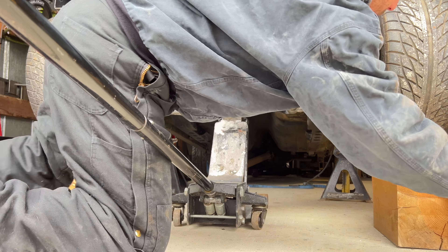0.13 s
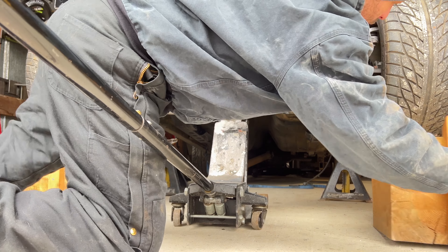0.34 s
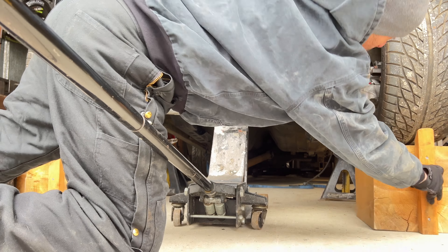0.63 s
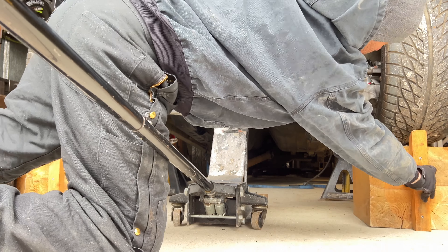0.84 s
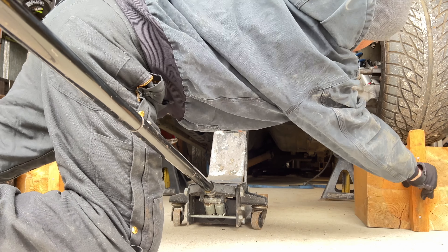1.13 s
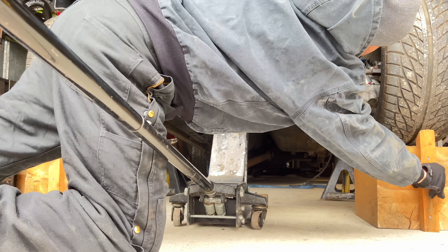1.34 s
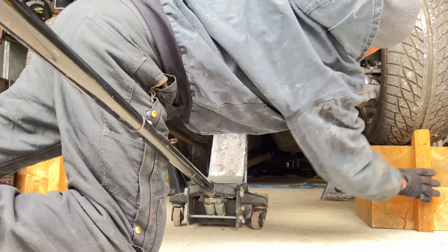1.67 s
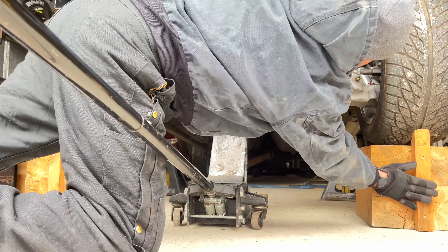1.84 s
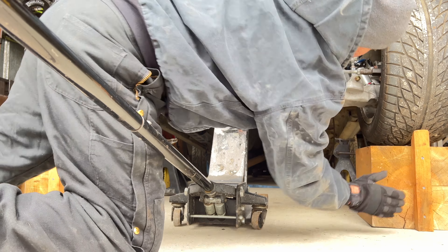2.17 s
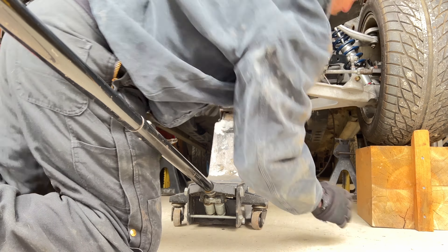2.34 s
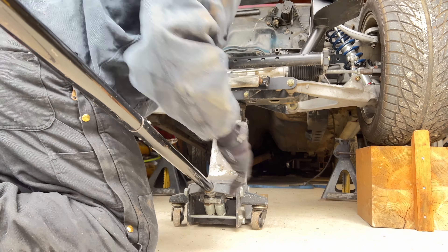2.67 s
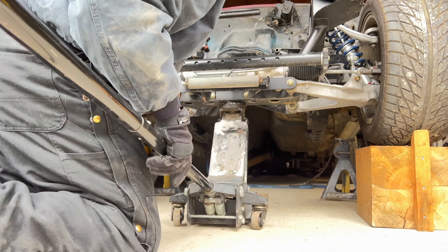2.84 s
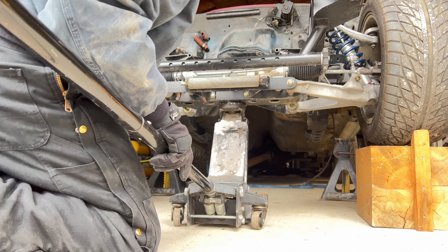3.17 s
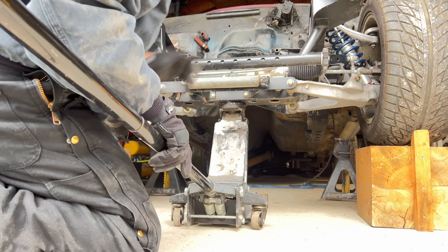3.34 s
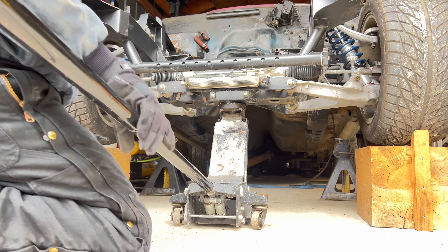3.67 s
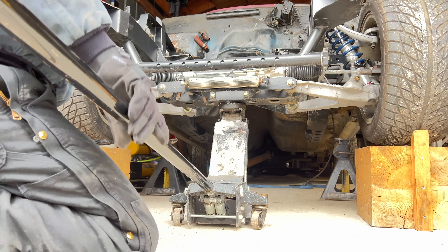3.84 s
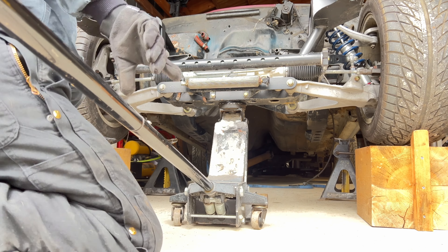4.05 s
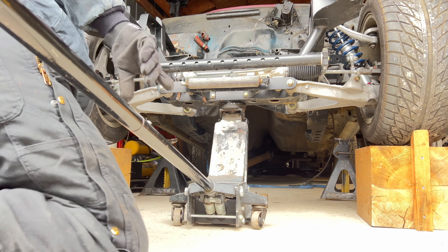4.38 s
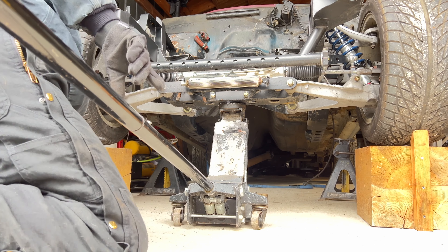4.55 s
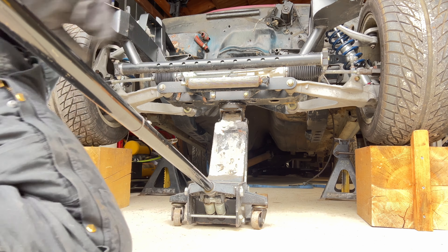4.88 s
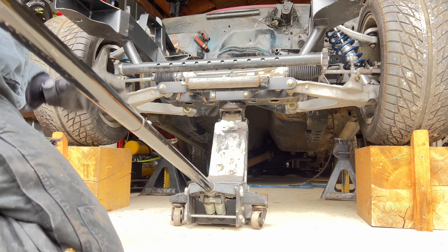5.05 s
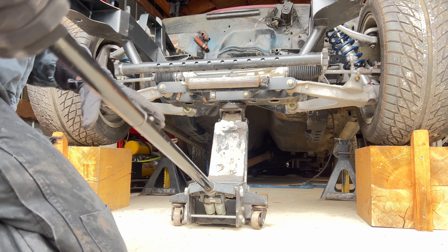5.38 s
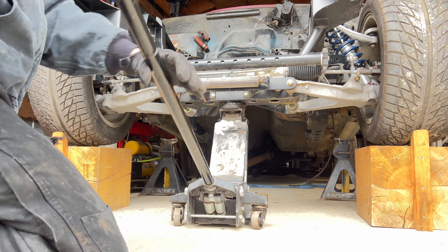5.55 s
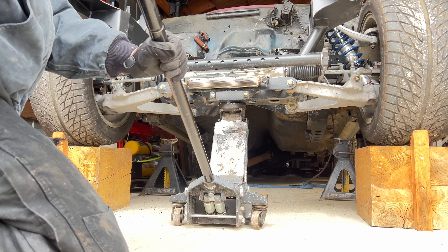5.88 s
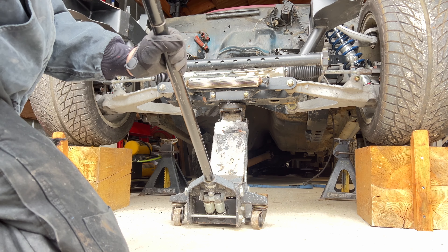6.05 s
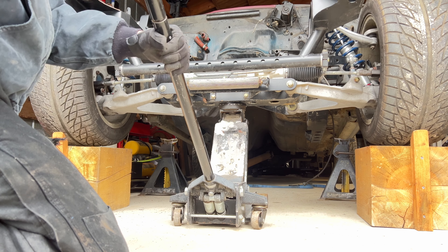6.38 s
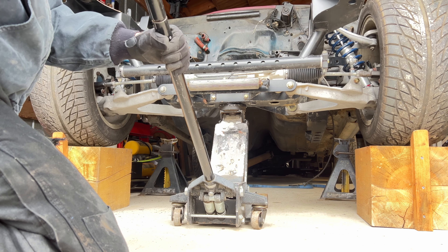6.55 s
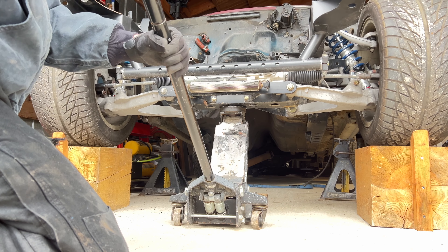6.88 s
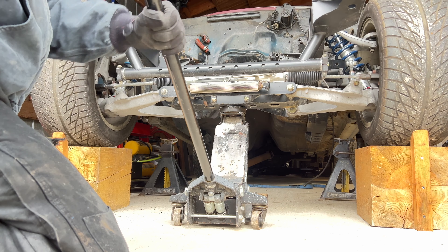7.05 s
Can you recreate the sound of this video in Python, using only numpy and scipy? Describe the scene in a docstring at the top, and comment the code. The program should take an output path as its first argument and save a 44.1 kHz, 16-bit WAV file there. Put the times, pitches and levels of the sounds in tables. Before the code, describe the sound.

Wood scrapes and crunches on a garage floor, then heavy clothes rustle among soft thuds and a metal jack handle clinks.

```python
"""In a garage, a mechanic kneels by a floor jack and shoves a wooden wheel block to the right.
The wood sticks and slips on the concrete, so it scrapes, shudders and crunches the grit under it.
He shifts his weight with a thud, his work clothes rub and rustle on the left, a zipper pull tinkles,
and the steel jack handle clinks in its socket as he takes hold of it."""
import sys
import numpy as np
from scipy import signal
from scipy.fft import rfft, irfft, next_fast_len
from scipy.io import wavfile
from scipy.ndimage import map_coordinates

SR = 44100
rng = np.random.default_rng(int(sys.argv[2]) if len(sys.argv) > 2 else 0)


def output_pcm(signal):
    """Save a mono or channel-first signal as 16-bit PCM at the path in sys.argv[1].

    Samples are clipped to [-1, 1] before scaling.
    """
    pcm = np.clip(np.atleast_2d(signal).T, -1, 1) * 32767
    wavfile.write(sys.argv[1], SR, np.round(pcm).astype(np.int16))


N = 318402

# The tone of each noise. Each row: frequency in Hz, relative level in dB.
AIR_TONE = [(20, -12), (80, 6.5), (180, -4.5), (500, -15), (1100, -11), (1500, -13), (1800, -5.5),
            (2200, -10), (2900, -30), (7500, -24), (11000, -42.5), (16000, -38)]  # the quiet room
FLAP_TONE = [(15, -24.5), (35, -4), (80, 0), (170, -2.5), (300, -5), (450, -12.5), (800, -21),
             (1500, -43.5)]  # cloth flapping
RUB_TONE = [(200, -11), (450, -0.5), (650, 0.5), (1100, -2.5), (1500, -4), (2100, -2), (3000, -9.5),
            (5000, -28)]  # cloth rubbing
SWISH_TONE = [(1500, 2.5), (3000, 2), (4500, 2.5), (7000, 0), (9000, -3.5), (11000, -6), (13500, -16),
              (16000, -16.5)]  # cloth swishing
SCRAPE_TONE = [(130, -37), (220, -4.5), (376, 2), (451, 5.5), (586, -6), (686, -3), (845, -5.5),
               (1080, -0.5), (1410, 1.5), (5000, -26.5), (6500, -55), (11000, -120)]  # wood on concrete
SHUDDER_TONE = [(15, -11), (35, -18), (55, -2.5), (73, 2.5), (110, -2.5), (160, -4.5), (250, -14.5),
                (500, -46)]  # the block shaking
GRIT_TONE = [(1500, -29.5), (2700, 3.5), (4500, 1.5), (7000, -2.5), (10000, -3), (12000, -5.5),
             (13500, -20), (16000, -7)]  # coarse grit
SAND_TONE = [(1500, -18), (2700, -13), (4800, -13), (6100, 4.5), (6600, 17), (7100, -19), (9000, 10.5),
             (10800, 11), (12500, -11), (16000, -14)]  # fine sand
# How alike a noise is in both ears. Each row: frequency in Hz, likeness from 0 to 1.
EAR_LIKENESS = [(60, 1), (130, 0.95), (280, 0.92), (600, .72), (1200, 0.2), (3000, 0.13), (7000, 0.44)]
# The garage's echo. Each row: frequency in Hz, fade time in seconds (the time to fall by 60 dB).
ECHO_FADES = [(70, 0.4), (170, 0.16), (500, 0.13), (2000, 0.2), (10000, .15)]
# The faint rustle of the kneeling man. Each row: time in seconds, level in dB.
STIRRING = [(0.0, -67), (0.36, -68.5), (1.8, -71.5), (2.01, -83.5), (2.28, -66), (2.97, -65.5), (3.03, -80),
            (3.3, -64.5), (4.44, -68.5), (4.52, -80), (4.8, -74.5), (4.95, -62.5), (5.3, -67),
            (5.45, -64.5), (6.08, -79.5), (6.17, -80), (6.4, -67.5), (6.5, -100), (6.68, -71.5),
            (6.87, -89.5), (6.96, -59.5), (7.22, -68.5)]
# Sweeps of a sleeve or trouser leg. Each row: start, length and rise time in seconds,
# then the levels of rub, flap and swish in dB.
CLOTH_SWEEPS = [ (0.143, 0.078, 0.016, -50.5, -47, -53.5), (2.275, 0.027, .01, -58.5, -68, -72.5),
                (2.528, 0.11, .02, -80, -58.5, -72.5), (2.742, 0.11, 0.024, -53, -51.5, -51.5),
                (2.904, 0.068, 0.02, -60.5, -54.5, -60), (3.057, 0.085, 0.011, -70, -69, -63.5),
                (3.446, 0.055, 0.018, -59.5, -63, -58), (3.63, 0.043, 0.031, -53.5, -58, -56),
                (3.776, 0.028, 0.0032, -57, -53.5, -58), (3.975, 0.053, 0.011, -49.5, -50, -49.5),
                (4.094, 0.038, 0.0042, -56.5, -58, -61), (4.194, 0.066, 0.007, -49.5, -46.5, -56),
                (4.313, 0.12, 0.0061, -51, -56.5, -48.5), (4.379, 0.063, 0.022, -49, -48, -53.5),
                (4.609, 0.024, .01, -71, -61, -78), (4.862, 0.07, 0.012, -69, -61, -66),
                (5.051, 0.056, 0.024, -50.5, -52, -50.5), (5.099, 0.089, .02, -52.5, -54.5, -54.5),
                (5.353, 0.075, 0.016, -57.5, -56, -63), (5.568, 0.077, 0.018, -54, -50, -54.5),
                (5.666, 0.051, .01, -67, -58, -75), (5.845, 0.045, .008, -66, -54, -89),
                (5.924, 0.143, 0.011, -60, -57.5, -66), (6.043, 0.037, .012, -59.5, -54.5, -77),
                (6.102, 0.025, .01, -74, -61.5, -87), (6.348, 0.024, 0.01, -61.5, -59, -69),
                (6.703, 0.049, 0.026, -62, -57.5, -63), (6.930, 0.045, 0.0098, -60.5, -59, -57),
                (6.989, 0.033, 0.0072, -47.5, -43.5, -51.5), (7.042, 0.071, 0.011, -53, -52.5, -53),
                (7.198, 0.044, 0.018, -54, -59, -77.5), ]
# Snaps of grit, wood, cloth and fasteners. Each row: start in seconds, level in dB, pitch in Hz,
# fade time in seconds, side (below 0 is left, above 0 is right).
SMALL_SNAPS = [(0.113, -47.5, 11900, .03, -.16), (0.380, -42, 4900, .015, .83),
               (0.958, -31.5, 1750, 0.048, .64), (0.967, -27, 10100, 0.026, -.18),
               (0.992, -32, 9000, .047, .3), (1.112, -38, 5930, .046, -0.16), (1.136, -36, 8000, .048, .3),
               (1.305, -30.5, 9660, .067, .3), (1.337, -28.5, 9850, 0.11, .55),
               (1.402, -29, 7150, .033, .3), (1.839, -29.5, 950, 0.026, .86), (2.475, -37, 9700, .023, .07),
               (3.075, -45.5, 4850, 0.025, -1.5), (3.783, -45, 5000, 0.02, -.55),
               (3.883, -48, 7000, 0.015, -1.1), (3.982, -39.5, 3970, 0.04, -1),
               (4.110, -39.5, 4200, .03, -1), (4.203, -31.5, 1050, 0.028, -.58),
               (4.314, -28, 3300, 0.012, -1), (4.403, -28, 7470, .017, -1.1),
               (4.414, -35.5, 950, .05, -1.2), (4.903, -48.5, 10000, 0.019, -.8),
               (5.569, -38.5, 845, 0.045, -.5), (5.599, -38.5, 9200, .02, -.68),
               (5.600, -37.5, 1600, 0.032, -.58), (5.640, -30, 13970, .018, -.85),
               (5.669, -38.5, 9670, 0.043, -.65), (5.996, -41, 5900, 0.015, -1),
               (6.061, -43.5, 5000, 0.021, -1), (6.321, -46.5, 6020, 0.052, -1.2),
               (6.392, -47.5, 7100, 0.013, -1.1), (6.643, -55.5, 5800, .039, -1)]
# The zipper pull's tinkles. Each row: start in seconds, level in dB.
ZIPPER_TINKLES = [(4.404, -44.5), (4.427, -40.5), (4.433, -35.5)]
# The notes that metal rings with. Each row: pitch in Hz, relative level in dB, fade time in seconds.
ZIPPER_NOTES = [(9700, 3.5, 0.025), (12500, -5.5, 0.041), (15180, -9.5, 0.045)]
HANDLE_NOTES = [(1135, 2.5, 0.041), (1800, -3, 0.046), (2083, 5, 0.013), (2410, 1.5, 0.051),
                (2970, -9, 0.054), (3270, -9.5, 0.083), (4080, -15, .05), (5530, -4.5, 0.081),
                (6900, -19, 0.064), (8900, -22, 0.051)]
# The handle hits its socket. Each row: start in seconds, ring and rattle levels in dB,
# the rattle's fade time in seconds, treble lift in dB per octave.
HANDLE_CLINKS = [(5.395, -45.5, -37, 0.029, 2), (6.987, -59, -45.5, 0.17, 2.5),
                 (6.994, -50, -29.5, 0.042, 0.5)]
# Dull blows of block, knees, hands and jack. Each row: start in seconds, level in dB,
# pitch in Hz at the loudest moment, head start of the right ear in milliseconds.
DULL_BLOWS = [(0.029, -55.5, 258, 0), (0.268, -48.5, 500, 0), (0.434, -24, 204, .22),
              (0.444, -30.5, 87.5, .22), (0.874, -47, 395, .15), (0.985, -37, 79, .13),
              (1.169, -50.5, 120, .15), (1.412, -43, 94, .15), (1.561, -42, 101, .15),
              (1.719, -40.5, 124, .22), (1.832, -35.5, 140, .15), (1.864, -33, 220, .15),
              (2.165, -47.5, 190, -.07), (2.434, -43, 368, -.18), (2.475, -16.5, 323, -.24),
              (2.479, -41, 47.5, -.1), (2.659, -48, 330, -.2), (2.696, -46.5, 323, -.21),
              (3.129, -48, 246, -.2), (4.202, -33.5, 524, -.1), (4.203, -42, 90, -.07),
              (4.261, -43.5, 143, -.12), (4.392, -41.5, 109, -.12), (4.876, -47.5, 316, -.15),
              (5.399, -40, 320, -.17), (5.579, -37, 201, -.05), (5.798, -44.5, 1040, -.23),
              (5.852, -57, 387, -.2), (6.055, -42, 245, -.2), (6.396, -49.5, 950, 0),
              (6.993, -40.5, 290, -.2)]
# Pitches that a space or object boosts. Each row: pitch in Hz, width in Hz, relative level in dB.
FLOOR_SLAB = [(40, 9.2, -15), (156.4, 11, -8.5), (286, 40, -18), (390, 53, -9)]  # the concrete floor slab
BLOCK_BODY = [(482.5, 23, 1.5), (704, 44, 3), (878, 75, 6), (1240, 54, -2), (1870, 240, -2),
              (2223, 170, -5.5), (2510, 39, -3.5)]  # the wooden block
# Shoves of the block. Each row: start, length and rise time in seconds, scrape, shudder and grit levels
# in dB, share of sand in the grit from 0 to 1, chatter pitch in Hz, chatter in dB above the scrape.
BLOCK_SHOVES = [ (0.372, 0.07, 0.036, -48, -45.5, -55, 0.2, 474.5, 1),
                (0.428, 0.34, 0.0046, -42, -39.5, -45.5, 0.06, 799, -1.5),
                (0.51, 0.12, 0.034, -44.5, -74, -59.5, 0, 1394, 2.5),
                (0.861, 0.16, 0.008, -63, -66, -69.5, 0, 800, -24),
                (0.953, 0.028, 0.0048, -45, -47.5, -44.5, 0.8, 1560, 4.5),
                (0.99, 0.019, .002, -41, -42, -48, .35, 1350, 7.5),
                (1.108, 0.039, .004, -51.5, -62, -48.5, .05, 439, -1.5),
                (1.192, 0.083, .03, -42.5, -46.5, -49, 0.27, 849, 1),
                (1.294, 0.097, .012, -44, -44, -47, 1, 1508, 1.5),
                (1.395, 0.015, 0.0045, -45, -48.5, -51, 0, 1250, 1.5),
                (1.498, 0.052, 0.031, -46, -48.5, -56, 0.6, 1184, -13),
                (1.629, 0.04, 0.019, -63.5, -73, -58.5, 0.12, 1000, -12),
                (1.824, 0.072, 0.017, -43.5, -38, -50, .2, 910, -20), ]


def amp(db):
    """Turn decibels into a volume factor."""
    return 10 ** (np.asarray(db) / 20)


def unit(x):
    """Scale a sound to an average strength (rms) of 1."""
    return x / np.sqrt(np.mean(x ** 2) + 1e-20)


def along(points, hz):
    """Read between a table's rows on a log frequency scale."""
    freqs, values = np.transpose(points)
    return np.interp(np.log(hz + 1), np.log(freqs + 1), values)


def wobble(per_s):
    """A smooth curve through per_s random values a second."""
    values = rng.standard_normal(int(N * per_s / SR) + 4)
    return map_coordinates(values, [np.arange(N) * per_s / SR])


def filtered(x, response):
    """Scale and delay each frequency as the response says."""
    n = x.shape[-1]
    size = next_fast_len(n + SR // 8)
    return irfft(rfft(x, size) * response(np.fft.rfftfreq(size, 1 / SR)), size)[..., :n]


def colour(x, tone):
    """Give a noise the tone in a table, at strength 1."""
    return unit(filtered(x, lambda hz: amp(along(tone, hz))))


def resonance(hz, centre, width):
    """A response that favours one pitch."""
    return 1j * hz * width / (centre ** 2 - hz ** 2 + 1j * hz * width)


def add(track, start, sound):
    """Mix a sound into a track, start seconds in."""
    part = track[..., round(start * SR):][..., :sound.shape[-1]]
    part += sound[..., :part.shape[-1]]


def placed(x, lead_ms, left_db):
    """Give a direction: the right ear is earlier by lead_ms, the left louder by left_db."""
    sides = np.array([[1], [-1]])
    timed = filtered(x, lambda hz: np.exp(-1j * np.pi * hz * sides * lead_ms / 1000))
    return amp(sides * left_db / 2) * timed


def friction(per_s, hiss, spread_db=0):
    """Tiny random slips over a smooth hiss; the ears differ most in the treble."""
    slips = (rng.random(N) < per_s / SR) * amp(spread_db * np.clip(rng.standard_normal(N), -2, 2))
    pair = unit(slips * rng.standard_normal((2, N))) + hiss * rng.standard_normal((2, N))
    angle = lambda hz: np.arccos(along(EAR_LIKENESS, hz)) / 2
    mid, side = filtered(pair, lambda hz: np.array([np.cos(angle(hz)), np.sin(angle(hz))]))
    return unit(np.array([mid + side, mid - side]))


def stroke(length, rise_s, swell_db, fade_s):
    """The volume of one movement: it rises, swells near its middle, then fades."""
    t = np.arange(int((length + fade_s) * SR)) / SR
    arch = np.sin(np.pi * np.minimum(t / length, 1) ** 0.8)
    fade_db = 60 * np.maximum(t - length, 0) / fade_s
    return np.minimum(t / rise_s, 1) * amp(swell_db * (arch - 1) - fade_db)


def ring(notes, t):
    """Struck metal: each note starts at a random strength in each ear and fades."""
    out = np.zeros((2, len(t)))
    for hz, db, fade_s in notes:
        volume = amp(db + rng.normal(0, 4.3, (2, 1)) - 60 * t / fade_s)
        out += volume * np.sin(2 * np.pi * hz * t + rng.normal(0, 1, (2, 1)))
    return out


def room_air():
    """The room's faint, steady rumble and hiss."""
    air = colour(friction(per_s=1600, hiss=1.8, spread_db=1), AIR_TONE)
    return amp(-74.5) * placed(air, lead_ms=0.091, left_db=5.5)


def garage_echo(x, gap_s=0.009):
    """Floor, car and walls answer after a short gap; each frequency fades at its own speed."""
    hz, t, noise = signal.stft(rng.standard_normal((2, SR // 2)), SR, nperseg=256)
    fading = noise * amp(-60 * t / along(ECHO_FADES, hz)[:, None])
    mid, side = signal.istft(fading, SR, nperseg=256)[1]
    side = filtered(side, lambda f: f / (f + 700))  # long waves reach both ears alike
    tail = np.pad([mid + side, mid - side], ((0, 0), (round(gap_s * SR), 0))) / np.linalg.norm(mid)
    return signal.fftconvolve(x, tail, axes=1)[:, :N]


def clothes():
    """Heavy cotton rubs, flaps and swishes as its folds catch and let go."""
    stir_db = np.interp(np.arange(N) / SR, *np.transpose(STIRRING)) + wobble(25)  # in small fits
    power = np.outer(amp([0, 2.5, -2.5]), amp(stir_db)) ** 2  # rub, flap, swish
    for start, length, rise_s, *levels_db in CLOTH_SWEEPS:
        sweep = stroke(length, rise_s, swell_db=3, fade_s=0.15)
        add(power, start, np.outer(amp(levels_db), sweep) ** 2)
    rubbing, flapping, swishing = np.sqrt(power)
    folds = amp(2.06 * wobble(70))
    flap = flapping * colour(friction(per_s=400, hiss=1.7), FLAP_TONE)
    rub = rubbing * colour(friction(per_s=900, hiss=1.4, spread_db=5), RUB_TONE)
    swish = swishing * colour(friction(per_s=900, hiss=1.5, spread_db=2), SWISH_TONE)
    rustle = placed(rub, lead_ms=-0.28, left_db=2) + placed(swish, lead_ms=-0.019, left_db=5)
    return placed(flap, lead_ms=-0.086, left_db=-1.6) + folds * rustle


def snaps():
    """A little contact sprays fading noise; short snaps start with a spike, long ones swell."""
    out, t = np.zeros((2, N)), np.arange(SR // 6) / SR
    for start, db, hz, fade_s, side in SMALL_SNAPS:
        swell = amp(-60 * t / fade_s) * (1 - np.exp(-t / (0.026 * fade_s)))
        spike = 5.3 * np.exp(-t / 0.00049 - fade_s / 0.007)
        noise = rng.standard_normal(len(t)) + 1.3 * rng.standard_normal((2, len(t)))
        spray = unit(filtered(noise, lambda f: resonance(f, hz, width=0.51 * hz)))
        snap = amp(db - 5) * (swell + spike) * spray
        add(out, start, placed(snap, lead_ms=0.15 * side, left_db=-4.5 * side))
    return out


def zipper():
    """The small brass pull rings with high, short notes."""
    out, t = np.zeros((2, N)), np.arange(SR // 4) / SR
    for start, db in ZIPPER_TINKLES:
        add(out, start, amp(db) * ring(ZIPPER_NOTES, t) * (1 - np.exp(-t / 0.0012)))
    return out


def jack_handle():
    """The loose steel handle rings in its socket, and its rattle blurs the same notes."""
    out, t = np.zeros((2, N)), np.arange(SR // 4) / SR
    blurred = lambda f: np.sqrt(sum(abs(amp(db) * resonance(f, hz, width=0.047 * hz)) ** 2
                                    for hz, db, _ in HANDLE_NOTES))
    strike = (1 - np.exp(-t / 0.00031)) * (1 + 1.1 * np.exp(-t / 0.0012))  # hardest at first
    for start, ring_db, rattle_db, fade_s, lift_db in HANDLE_CLINKS:
        rattle = unit(filtered(rng.standard_normal((2, len(t))), blurred))
        rattle *= amp(rattle_db - 60 * t / fade_s)
        clink = strike * (amp(ring_db) * ring(HANDLE_NOTES, t) + rattle)
        add(out, start, filtered(clink, lambda f: amp(lift_db * np.log2(np.maximum(f, 500) / 2000))))
    return out


def thuds(rise_cycles=1.3, scuff_fade_s=0.12, echo_s=0.0125):
    """A soft blow swells as its pitch sinks, scuffs, echoes dully off the car, and the concrete floor booms."""
    out, t = np.zeros((2, N)), np.arange(SR // 8) / SR
    for start, db, hz, lead_ms in DULL_BLOWS:
        age = t * hz / rise_cycles  # 1 at the loudest moment
        swell = (age * np.exp(1 - age)) ** 1.33
        wave = swell * np.sin(4 * np.pi * rise_cycles * np.log1p(age))
        scuff = unit(filtered(rng.standard_normal((2, len(t))), lambda f: 1 / (1 + (f / (3 * hz)) ** 6)))
        scuff *= np.minimum(3 * age, 1) * amp(-19 - 60 * t / scuff_fade_s)
        add(out, start, amp(db) * (placed(wave, lead_ms, left_db=0.5) + scuff))
    echo = lambda f: amp(-12) * np.exp(-2j * np.pi * f * echo_s) / (1 + 1j * f / 350)
    boom = lambda f: sum(amp(db) * resonance(f, hz, width) for hz, width, db in FLOOR_SLAB)
    return filtered(out, lambda f: 1 + echo(f) + boom(f))


def chatter(hz, length, volume, sink_octaves=0.15, smear=0.22):
    """The block's dragging edge chatters at a sinking pitch, which uneven slips smear."""
    t = np.arange(len(volume)) / SR
    pitch = hz * 2 ** (sink_octaves * (0.5 - np.minimum(t / length, 1)))
    phase = 2 * np.pi * np.cumsum(pitch) / SR
    slips = [map_coordinates(row, [t * smear * hz], mode="wrap") for row in rng.standard_normal((2, 512))]
    return volume * unit(slips[0] * np.sin(phase) + slips[1] * np.cos(phase))


def shoves():
    """The shoves give the volumes of scrape, grit, sand and shudder, and the sound of the chatter."""
    sliding, shuddering, chattering = np.zeros((3, N)), np.zeros(N), np.zeros(N)
    for start, length, rise_s, scrape_db, shudder_db, grit_db, sand, hz, chatter_db in BLOCK_SHOVES:
        push = lambda fade_s: stroke(length, rise_s, swell_db=5, fade_s=fade_s)
        coarse, fine = amp(grit_db) * np.sqrt([1 - sand, sand])
        add(sliding, start, np.outer([amp(scrape_db), coarse, fine], push(0.099)))
        add(shuddering, start, amp(shudder_db) * push(0.15))  # outlasts the scrape
        add(chattering, start, amp(scrape_db + chatter_db) * chatter(hz, length, push(0.034)))
    return (*sliding, shuddering, chattering)


def wheel_block():
    """Wood sticks and slips on concrete: the block shudders and rings, and grit crunches under it."""
    scraping, gritty, sandy, shuddering, chattering = shoves()
    grip = amp(2 * wobble(90))  # the edge catches and lets go
    ringing = lambda f: sum(amp(db) * resonance(f, hz, width) for hz, width, db in BLOCK_BODY)
    body = unit(filtered(friction(per_s=2300, hiss=0.62), ringing))
    rasp = colour(friction(per_s=830, hiss=0.37), SCRAPE_TONE)
    scrape = scraping * (body + rasp) + chattering
    coarse = colour(friction(per_s=1700, hiss=1, spread_db=3.5), GRIT_TONE)
    fine = colour(friction(per_s=420, hiss=0.51), SAND_TONE)
    grit = amp(1.3 * wobble(260)) * (gritty * coarse + sandy * fine)  # grains crush in clumps
    shudder = shuddering * colour(friction(per_s=580, hiss=0.64), SHUDDER_TONE)
    wood = placed(grip * scrape, lead_ms=0.16, left_db=-1) + placed(shudder, lead_ms=0.093, left_db=-1)
    return wood + placed(grip * grit, lead_ms=0.15, left_db=2)


def scene():
    """Mix all the sounds; the blows, clicks and block also echo in the garage."""
    blows = thuds()
    clicks = snaps() + placed(jack_handle() + zipper(), lead_ms=-0.355, left_db=3)
    block = wheel_block()
    direct = room_air() + clothes() + clicks + blows + block
    return direct + garage_echo(amp(-17) * (blows + block) + amp(-21.5) * clicks)


def record(dry, split_hz=7500, top_hz=15950):
    """Above split_hz both ears hear the left side, the right with shifted phase; top_hz is the limit."""
    left, right = dry
    treble = lambda hz: 1 / (1 + (split_hz / (hz + 1)) ** 30)
    shift = lambda hz: np.exp(2j * np.pi * (hz - 8400) / 3660)
    right_lows = filtered(right, lambda hz: np.sqrt(1 - treble(hz)))
    right_highs = filtered(left, lambda hz: np.sqrt(treble(hz)) * shift(hz))
    return filtered(np.array([left, right_lows + right_highs]), lambda hz: hz < top_hz)


dry = scene()
out = record(dry)
output_pcm(out)
```